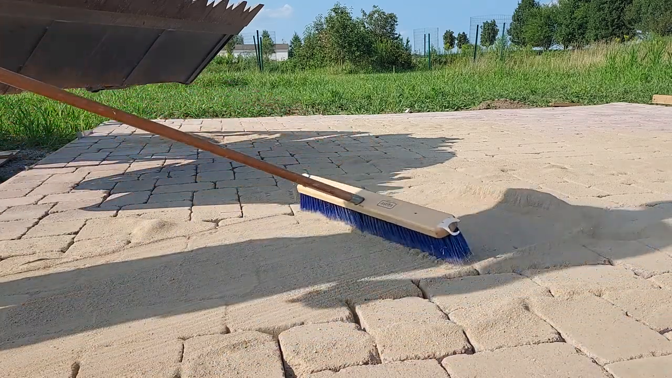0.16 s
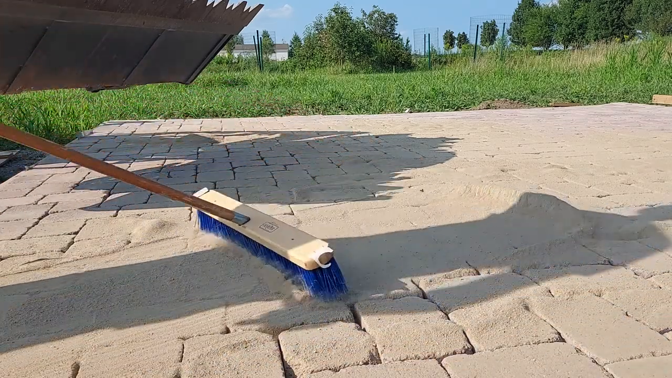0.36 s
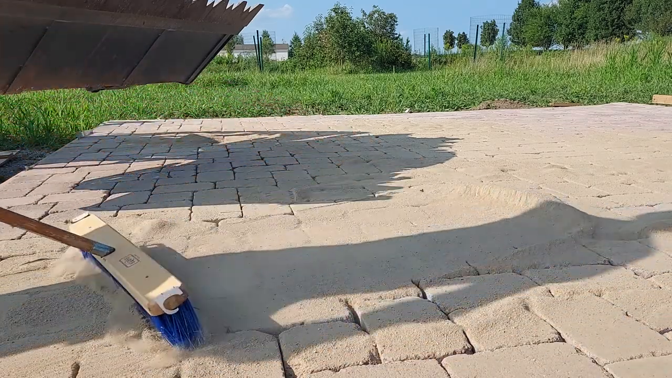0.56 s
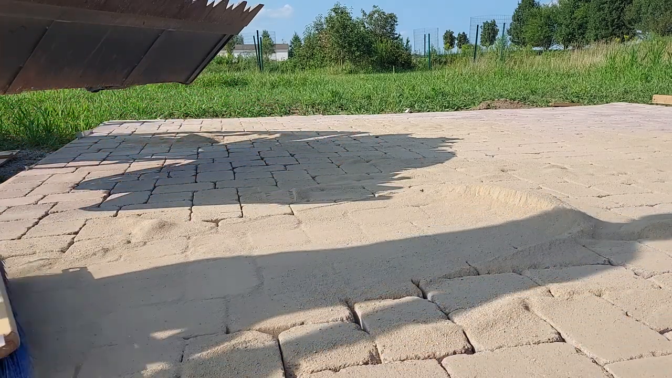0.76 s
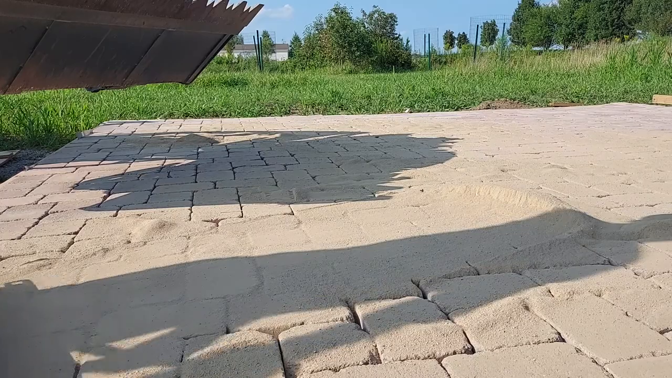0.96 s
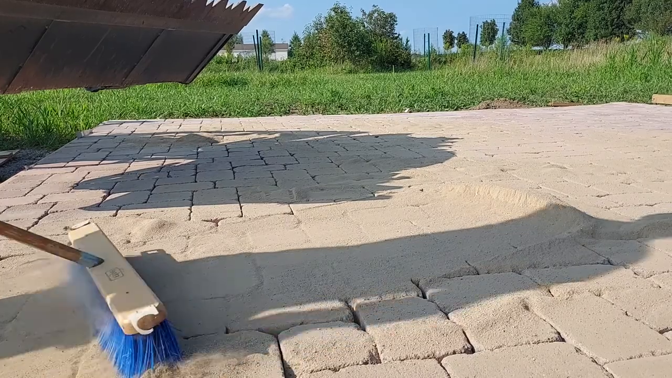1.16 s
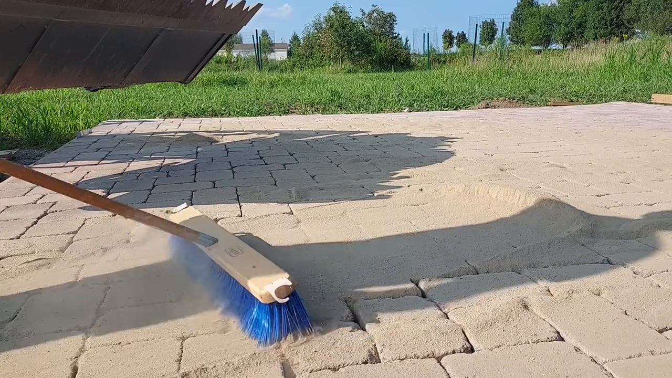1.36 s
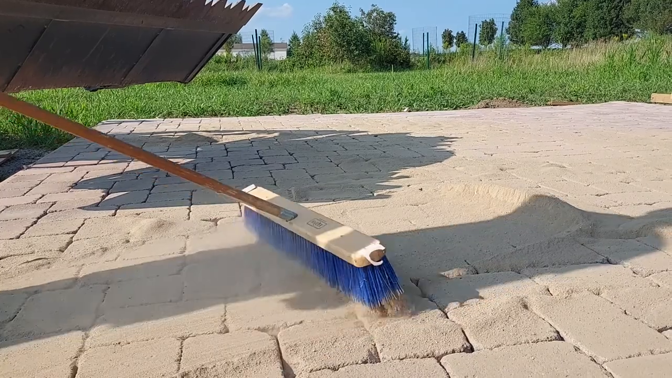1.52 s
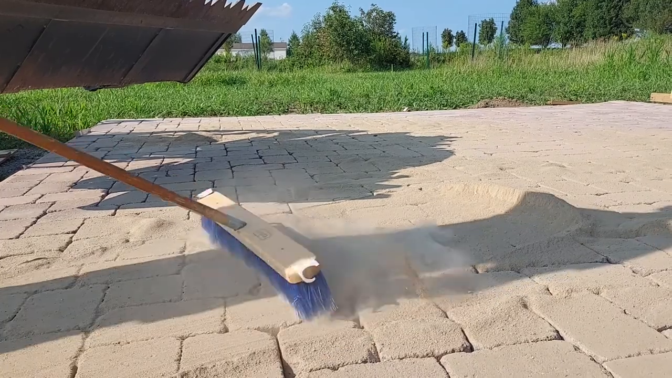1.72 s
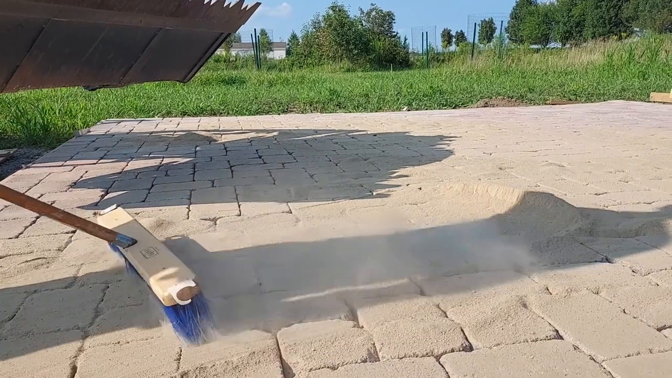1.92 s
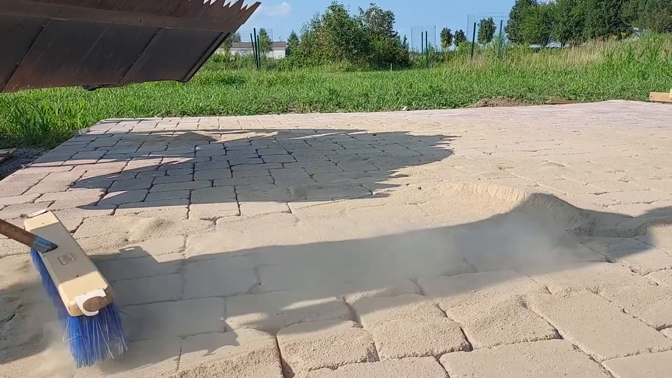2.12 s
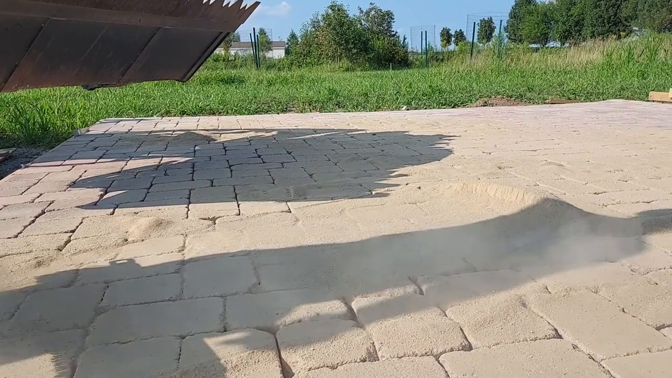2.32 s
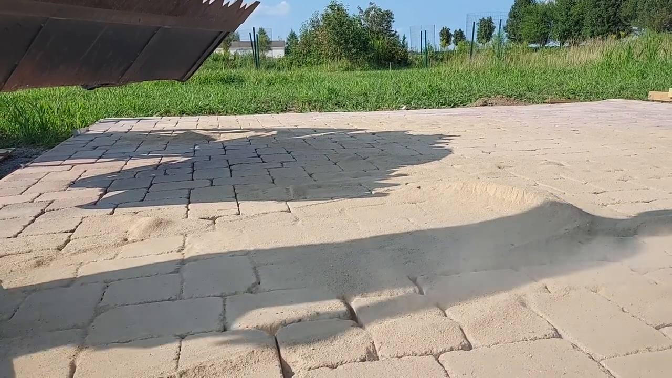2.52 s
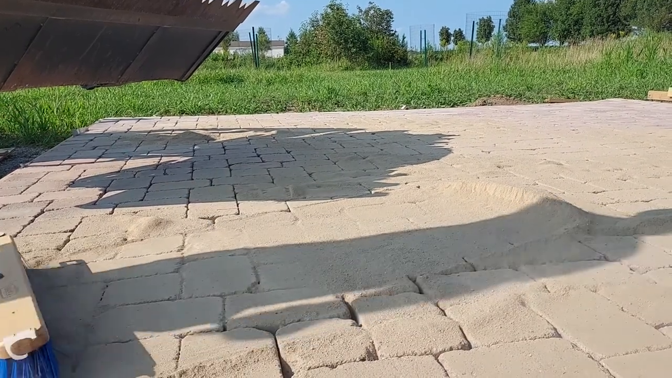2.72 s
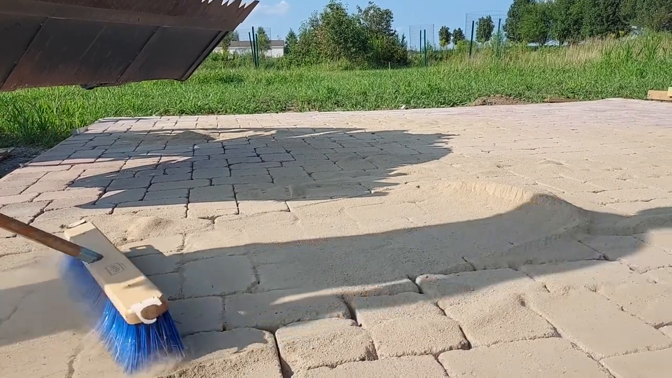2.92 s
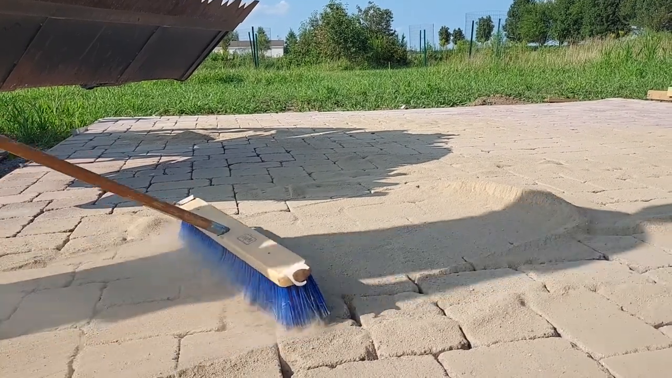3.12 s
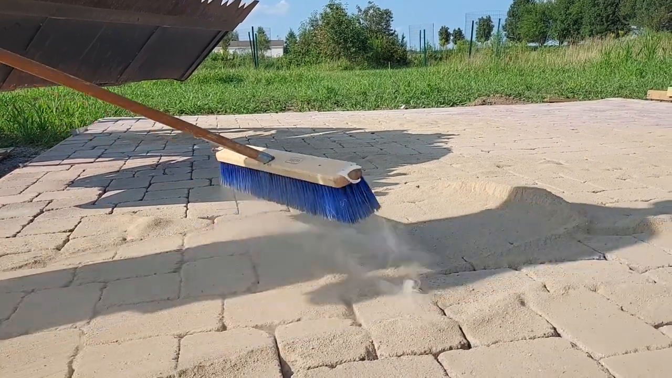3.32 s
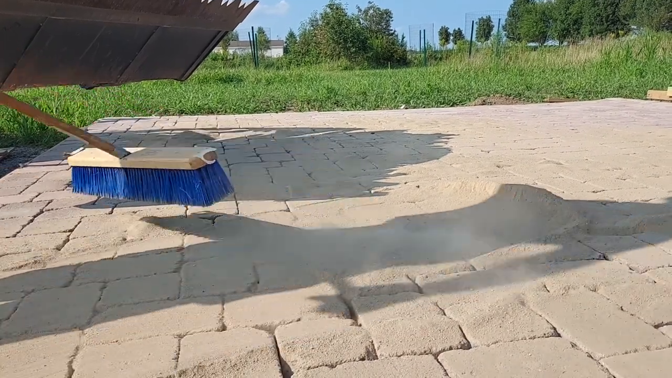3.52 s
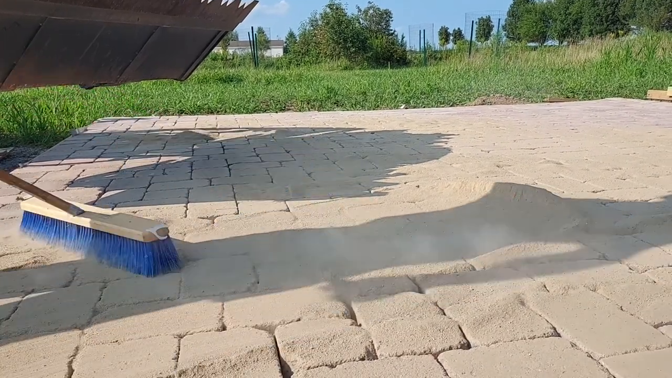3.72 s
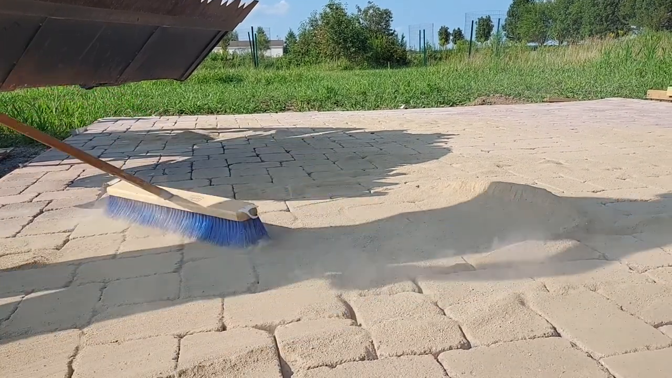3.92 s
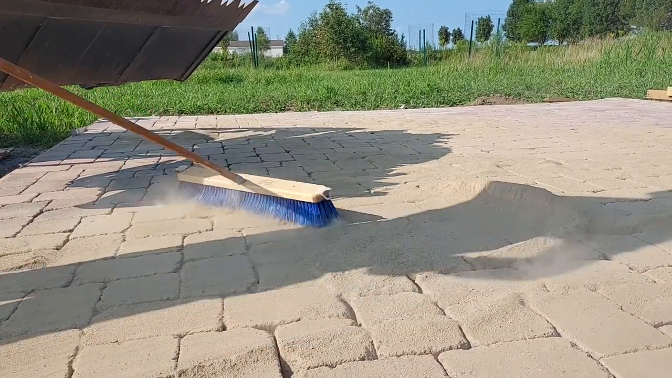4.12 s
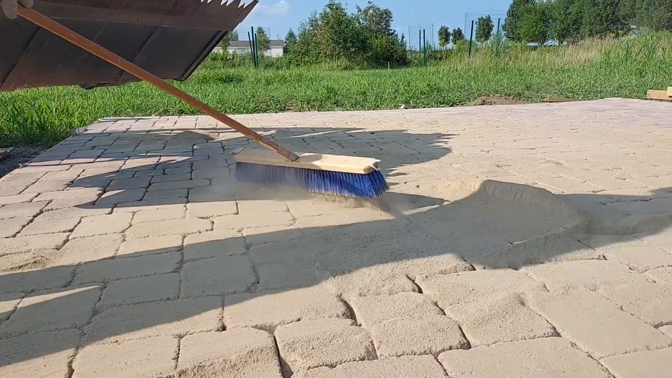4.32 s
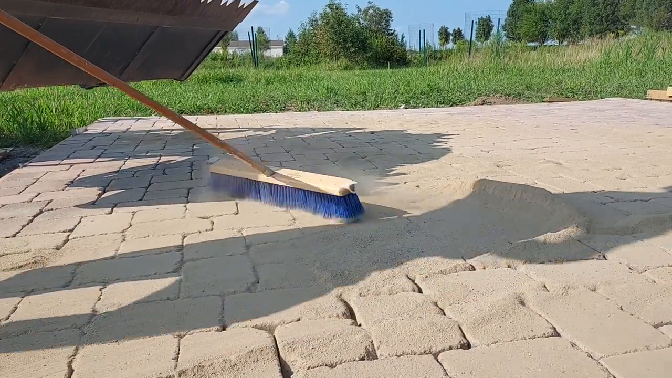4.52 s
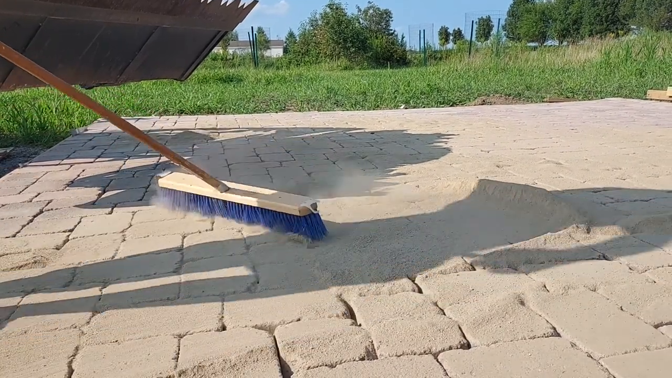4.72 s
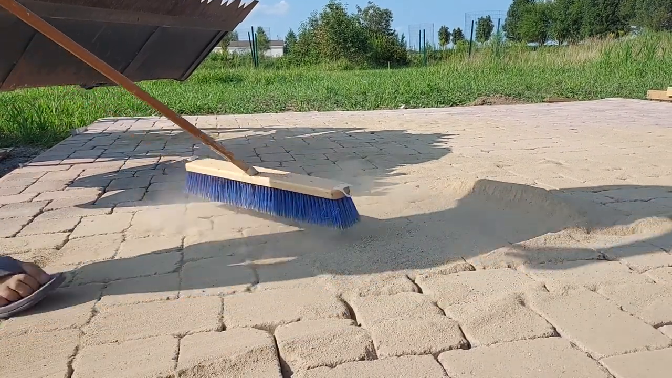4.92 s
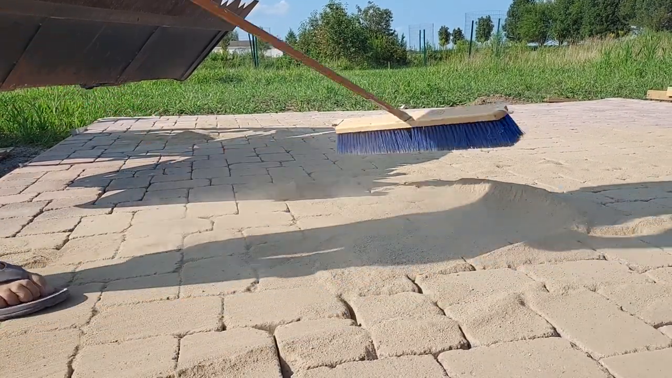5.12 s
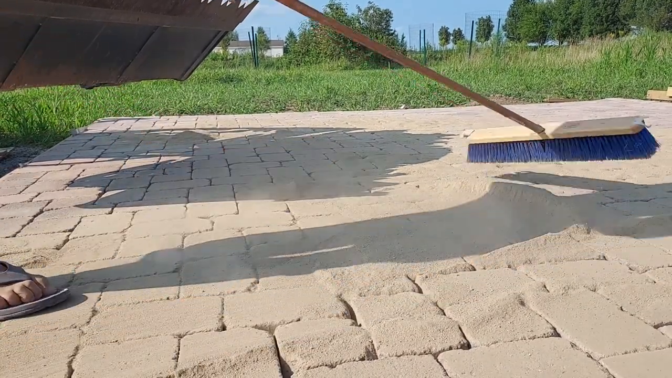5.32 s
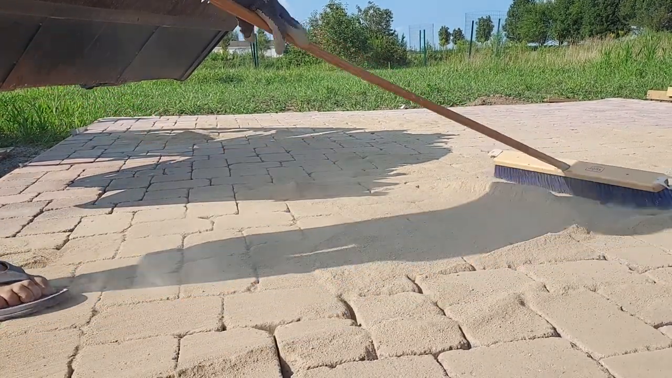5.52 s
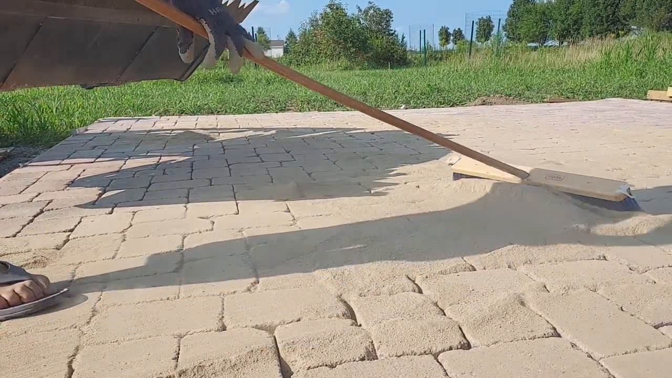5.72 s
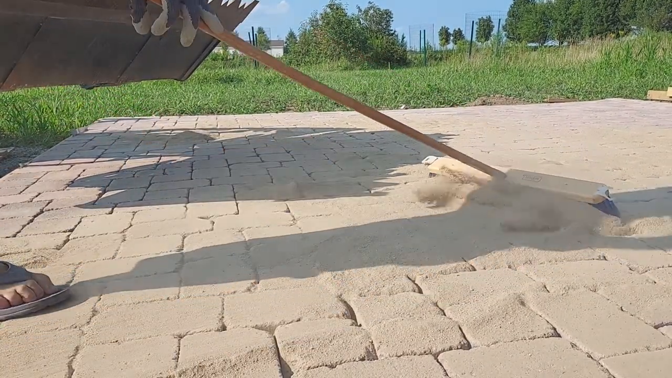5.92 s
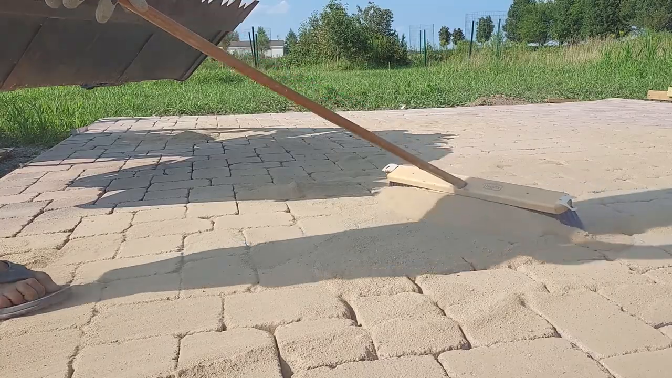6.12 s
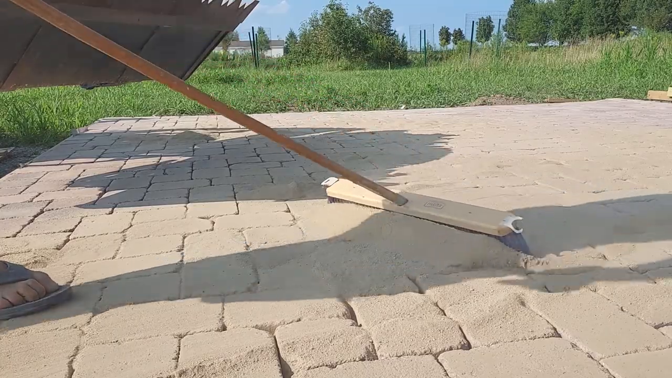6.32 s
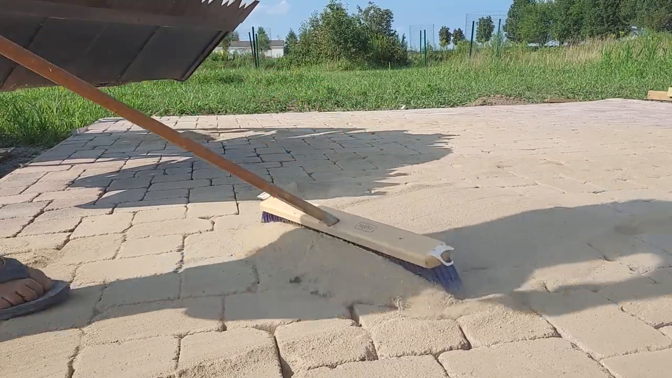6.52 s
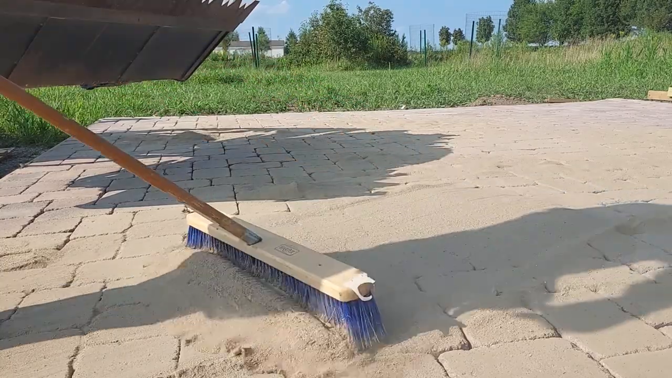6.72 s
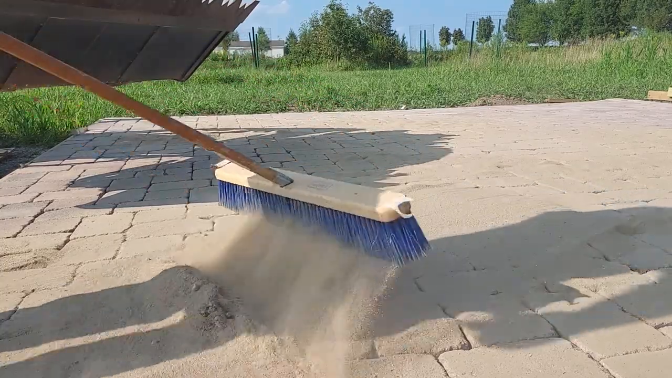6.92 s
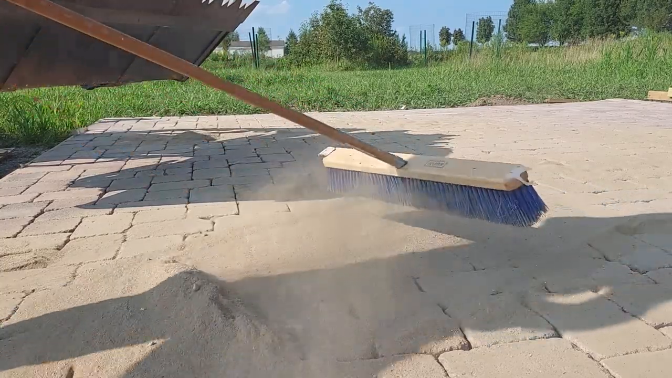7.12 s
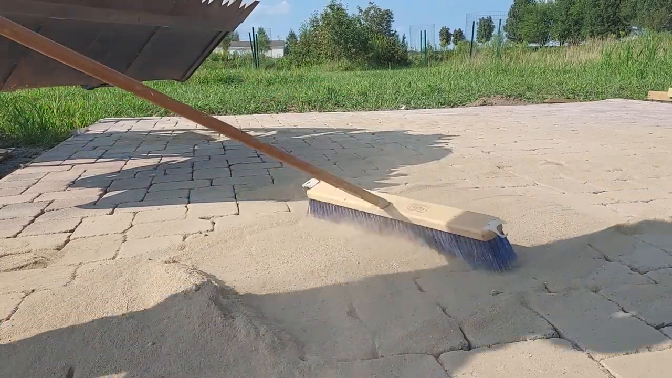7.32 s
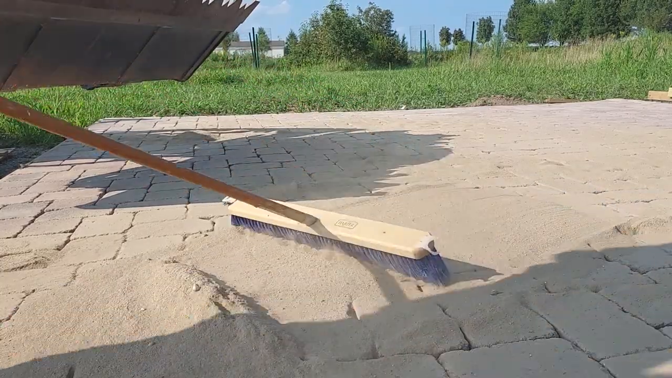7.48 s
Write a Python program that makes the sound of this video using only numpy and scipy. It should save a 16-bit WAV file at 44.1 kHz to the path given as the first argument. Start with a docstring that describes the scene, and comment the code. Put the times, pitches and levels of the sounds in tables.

```python
"""A broom scratches through dry sand on paving stones outdoors, over breeze rumble and insect buzz.
Strokes are coloured grain noise: bristle scratch, fine-sand hiss, rasp of the pushed heap.
Landings add a noise crunch with a ringing mode, and knocks from damped modes of the wooden head.
A small bird twitters in sliding sine chirps; a sandal scuffs in noise bursts, with a soft footfall thud.
All is heard through two microphone ports of a phone held low."""
import sys
import numpy as np
from scipy import signal
from scipy.fft import rfft, irfft, next_fast_len
from scipy.io import wavfile
from scipy.ndimage import uniform_filter1d, map_coordinates

SR = 44100
rng = np.random.default_rng(int(sys.argv[2]) if len(sys.argv) > 2 else 0)


def generate_wav(sig):
    """Save sig (samples, or channels by samples) to the path in sys.argv[1] as 16-bit PCM at SR."""
    pcm = np.round(np.clip(np.atleast_2d(sig).T, -1, 1) * 32767).astype(np.int16)
    wavfile.write(sys.argv[1], SR, pcm)


N = 332955
FFT_N = next_fast_len(N)
BINS_HZ = np.fft.rfftfreq(FFT_N, 1 / SR)

# broom strokes: start/s, end/s, level/dB, swell from start to end/dB, mid-stroke bulge/dB,
# fine sand re scratch/dB, heap re scratch/dB, heap growth/dB, left lead at start/ms, left lead at end/ms
STROKES = [(-.1, 0.768, -42.5, 5.5, -2.5, 0, -2.5, 10, -0.11, 0.29),
           (0.963, 1.53, -37, 5.5, -3, 3, -3, -2.5, 0.3, 0.092),
           (1.677, 2.127, -45, -0.5, 3.5, 3.5, -2.5, -3, 0.088, 0.24),
           (2.48, 3.19, -37, 6, -3, 1.5, -4, -2.5, 0.36, 0.12),
           (3.688, 4.297, -37.5, 4, 0, 5, -5.5, -2.5, 0.21, 0.09),
           (4.534, 4.869, -44, -8, 6, 4, -2.5, -0.5, 0.082, .14),
           (5.472, 5.825, -58, -2, 17.5, 1, 3.5, 6, -0.12, -0.12),
           (6.121, 6.759, -56, 2.5, 9, -5.5, 1, 9, -0.068, -0.056),
           (7.267, 7.65, -42.5, 0, 7, 0, -0.5, 14, 0.027, 0.055)]
# rasp of the pushed heap: f/Hz, relative level/dB
RASP_COLOUR = [(200, -14.5), (400, -12.5), (600, -3), (900, 0), (1250, 4), (1480, 1), (1690, 2.5),
               (2000, -4.5), (3000, -12)]


def undb(db):
    """Decibels to gain."""
    return 10 ** (np.asarray(db) / 20)


def unit(x):
    """Scale to an rms of one."""
    return x / np.sqrt(np.mean(x ** 2))


def pan(left_minus_right_db):
    """Left and right gains for a level difference."""
    return undb(np.array([[left_minus_right_db], [-left_minus_right_db]]) / 2)


def spectrum(points):
    """Gain at every Fourier bin, interpolated in dB over log frequency."""
    hz, db = np.transpose(points)
    return undb(np.interp(np.log(BINS_HZ + 1), np.log(hz), db))


def filtered(x, gain):
    """Apply a gain to every Fourier bin."""
    return irfft(rfft(x, FFT_N) * gain, FFT_N)[..., :N]


def colour(x, points):
    """Colour a white signal and keep its power."""
    return filtered(x, unit(spectrum(points)))


def band(x, hz, width_hz):
    """Gaussian band of a white signal, power kept."""
    return filtered(x, unit(np.exp(-((BINS_HZ - hz) / width_hz) ** 2)))


def resonate(x, hz, width_hz):
    """One narrow resonance, gain one at its centre."""
    b, a = signal.iirpeak(hz, hz / width_hz, fs=SR)
    return signal.lfilter(b, a, x)


def walk(rate_hz):
    """Smooth random wandering, rms one: random steps under a moving average."""
    step = max(int(SR / rate_hz), 2)
    levels = np.repeat(rng.standard_normal(N // step + 2), step)
    return unit(uniform_filter1d(levels, step)[:N])


def grains(spread_db):
    """Dense tiny impacts, a few much stronger than the rest."""
    strength_db = spread_db * np.minimum(rng.exponential(size=N), 6)
    return unit(rng.standard_normal(N) * undb(strength_db))


def add(out, start_s, sound):
    """Mix a short sound in at a time."""
    i = max(int(start_s * SR), 0)
    out[..., i:i + sound.shape[-1]] += sound[..., :N - i]


def arrive(x, lead_ms):
    """Stereo by arrival time: a positive lead delays the right channel."""
    shift = lead_ms * SR / 1000
    return np.array([x, map_coordinates(x, [np.arange(N) - shift], order=3)])


def broom_wide(points, lead_ms, spread_db, width_ms, apart):
    """Three independent grain sources spread in direction, plus sound scattered off the stones."""
    tufts = np.zeros((2, N))
    for place in np.linspace(-1, 1, 3):
        tufts += arrive(colour(grains(spread_db), points), lead_ms + width_ms * place)
    scatter = colour(rng.standard_normal((2, N)), points)
    return unit(unit(tufts) + apart * scatter)


def broom_place(t):
    """Lead of the left microphone in ms: even travel along each stroke and on to the next start."""
    rows = np.array(STROKES)
    return np.interp(t, rows[:, :2].ravel(), rows[:, -2:].ravel())


def stroke_gains(t):
    """Effort drives the scratch; fine sand follows it most steeply, the heap least, with its own growth."""
    attack_s, release_s = 0.15, 0.11  # bristles bend into the sand, lift out of it
    hiss_per_effort, rasp_per_effort = 1.18, 0.77  # dB per dB of scratch effort
    scratch, hiss, rasp = np.zeros((3, N))
    for start, end, db, swell_db, bulge_db, fine_db, heap_db, growth_db, _, _ in STROKES:
        on = (t > start) & (t < end)
        along = (t[on] - start) / (end - start) - .5
        press = np.sin(np.pi / 2 * np.minimum((t[on] - start) / attack_s, 1))
        lift = np.sin(np.pi / 2 * np.minimum((end - t[on]) / release_s, 1)) ** 2
        contact = undb(db) * press * lift
        effort_db = swell_db * along + bulge_db * (np.cos(np.pi * along) - 2 / np.pi)
        scratch[on] += contact * undb(effort_db)
        hiss[on] += contact * undb(fine_db + hiss_per_effort * effort_db)
        rasp[on] += contact * undb(heap_db + rasp_per_effort * effort_db + growth_db * along)
    return scratch, hiss, rasp


def trickle_gains(t):
    """Sand runs off the lifted broom at a rising level; flung sand patters around each stroke's end."""
    start_s, end_s, final_db, rise_db = 4.9, 5.41, -57.5, 9
    settle_db, settle_s = -70, 0.086
    left = np.clip((end_s - t) / (end_s - start_s), 0, 1)
    running = undb(final_db - rise_db * left) * (t > start_s) * (t < end_s)
    settling = undb(settle_db) * sum(np.exp(-np.abs(t - stroke[1]) / settle_s) for stroke in STROKES)
    return running, settling


def sweeping(t, lead_ms):
    """Bristles flick over stone, fine sand hisses, the heap rasps; all catch and slip together."""
    # colours: f/Hz, relative level/dB
    scratch_colour = [(1200, -50), (1900, -0.5), (2500, 4), (3300, 3), (4100, 1.5), (5200, 5), (6400, -1.5),
                      (8000, 1.5), (10000, -9), (11500, -32), (14000, -30)]
    hiss_colour = [(7000, -31), (9500, -6.5), (11000, -3), (12300, 0.5), (14000, -1), (15800, -6)]
    scratch_gain, hiss_gain, rasp_gain = stroke_gains(t)
    catch = undb(1.36 * walk(38) + 0.19 * walk(400))
    scratch = broom_wide(scratch_colour, lead_ms, spread_db=2.5, width_ms=0.041, apart=0.077)
    fine = colour(grains(spread_db=0.0), hiss_colour) * undb(0.5 * walk(900))
    hiss = fine + undb(-15.0) * colour(rng.standard_normal((2, N)), hiss_colour)
    # the heap gives way in small uneven slides
    slides = undb(-2.55 + 0.91 * walk(70))
    rasp = slides * broom_wide(RASP_COLOUR, lead_ms, spread_db=3.0, width_ms=0.11, apart=0.42)
    # the dragging bristles keep the wooden head singing faintly
    singing = resonate(colour(grains(spread_db=2.0), RASP_COLOUR), hz=1648, width_hz=55)
    wood = undb(-11.0) * arrive(unit(singing), lead_ms)
    running, settling = trickle_gains(t)
    coarse_db = -2  # coarse grains re fine in the trickle
    trickle = running * (hiss + undb(coarse_db) * scratch) + settling * scratch
    return catch * (scratch_gain * scratch + hiss_gain * hiss + rasp_gain * (rasp + wood) + trickle)


def low_rumble():
    """Wind eddies rumble, more on the right; Gaussian low swells add breeze gusts and a footfall thud."""
    # colours: f/Hz, relative level/dB
    rumble_colour = [(20, -23), (35, -11), (55, 9.5), (80, 2), (120, -7.5), (160, -7), (230, -47),
                     (400, -45.5)]
    swell_colour = [(25, -6), (55, 6), (85, 3), (130, 0), (180, -22.5), (300, -26), (500, -57), (1500, -74)]
    # low swells: breeze gusts, and a soft footfall thud at 5.935 s:
    # t/s, level/dB, 1/e half length/s, left minus right/dB
    low_swells = [(0.016, -37, 0.14, -7), (0.228, -41.5, 0.055, 7), (0.314, -39, 0.035, -17),
                  (0.704, -48.5, 0.069, -12), (.85, -48.5, .025, -12), (1.345, -47.5, 0.17, -20),
                  (1.763, -47, 0.096, -13.5), (2.456, -43.5, 0.083, -22), (3.087, -55.5, 0.12, -16),
                  (3.472, -52, 0.075, -14), (3.848, -47, .18, -14), (5.626, -49.5, 0.13, -13),
                  (5.935, -41.5, 0.054, -27), (6.05, -47.5, 0.14, -11.5), (6.777, -51, 0.021, -18),
                  (7.142, -46, 0.016, -17)]
    calm_db, wander_db, calm_pan_db = -57, 1.5, -10.5
    common = .5 * rng.standard_normal(N)
    eddies = unit(colour(common + rng.standard_normal((2, N)), rumble_colour))
    strength = undb(calm_db + wander_db * walk(6)) * pan(calm_pan_db)
    t = np.arange(N) / SR
    swell_gain = np.zeros((2, N))
    for peak_s, db, half_s, pan_db in low_swells:
        swell_gain += undb(db) * pan(pan_db) * np.exp(-((t - peak_s) / half_s) ** 2)
    return strength * eddies + swell_gain * colour(rng.standard_normal((2, N)), swell_colour)


def meadow():
    """Coloured noise for soft distant air; Gaussian bands with wandering levels for insect choruses."""
    # distant air: f/Hz, relative level/dB
    air_colour = [(25, -16), (60, -14), (150, 1.5), (300, -14), (600, -21.5), (1400, -30), (2300, -22),
                  (6000, -37.5), (10000, -26.5), (12000, -21.5), (14500, -14), (16000, -12.5)]
    # insect choruses: f/Hz, 1/e half width/Hz, level/dB
    insects = [(4860, 430, -62.5), (7830, 730, -59.5)]
    air = rng.standard_normal(N) + 1.36 * rng.standard_normal((2, N))
    out = undb(-61.0 + 0.37 * walk(1.406)) * colour(air, air_colour)
    for hz, width_hz, db in insects:
        noise = 0.43 * rng.standard_normal(N) + rng.standard_normal((2, N))
        shimmer_db = .5 * walk(11) + 1.34 * walk(70)
        out = out + unit(band(noise, hz, width_hz)) * undb(db + shimmer_db)
    return out


def bird():
    """Evenly spaced thin whistles, each sliding down; pitch and level swing along the phrase."""
    # phrases: first chirp/s, last chirp/s, level/dB, moment of highest pitch/s
    phrases = [(.838, .876, -52, .72), (1.52, 1.611, -50, 1.5), (2.112, 2.331, -52, 2.16),
               (3.254, 3.506, -53, 3.32), (4.386, 4.422, -52, 4.45), (4.756, 5.219, -52, 4.79),
               (5.441, 5.481, -50, 5.42), (5.69, 5.73, -51, 5.57), (5.928, 6.46, -52, 6.05),
               (6.672, 6.98, -53, 6.77), (7.169, 7.29, -52, 7.23)]
    chirp_every_s, chirp_s, chirp_hz, fall = .0425, 0.0278, 4820, 0.079
    swing_s, swing_hz, swing_db = .29, 170, 1.5
    scatter_s, scatter_hz, scatter_db = 0.0024, 35, 4.6
    u, out = np.linspace(0, 1, int(chirp_s * SR)), np.zeros(N)
    for start, end, db, top_s in phrases:
        times = np.linspace(start, end, round((end - start) / chirp_every_s) + 1)
        for s, (late, sharp, loud) in zip(times, rng.standard_normal(size=(20, 3))):
            swing = np.cos(2 * np.pi * (s - top_s) / swing_s)
            centre_hz = chirp_hz + swing_hz * swing + scatter_hz * sharp
            pitch_hz = centre_hz * (1 + fall * (.3 - u ** 2))
            whistle = np.sin(np.pi * u) * np.sin(2 * np.pi * np.cumsum(pitch_hz) / SR)
            level_db = db + swing_db * swing + scatter_db * loud
            add(out, s + scatter_s * late, undb(level_db) * whistle)
    return arrive(out, 0.044)


def landings(lead_ms):
    """Tips strike and bend until the whole brush slaps down; both bursts excite a damped head mode."""
    # touchdowns: tips touch/s, time to bend/s, tips/dB, slap/dB, slap decay/s, relative ring/dB, ring f/Hz
    touchdowns = [(.964, 0.0052, -39, -37.5, 0.014, 3.5, 1720), (1.69, .024, -36, -27.5, 0.007, -1.5, 1690),
                  (2.45, .009, -34, -32.5, 0.0094, 0.5, 2190), (3.658, .01, -36.5, -25.5, 0.0061, -1, 1670),
                  (4.492, .012, -38.5, -32, 0.014, -3.5, 1620), (5.406, 0.015, -45, -28, .0073, -6, 1650),
                  (5.467, .004, -49, -49, 0.0062, 1, 1690), (7.255, .002, -38, -27.5, 0.0031, -4.5, 3040)]
    # crunch: f/Hz, relative level/dB
    crunch_colour = [(200, 14.5), (500, 2), (1100, 6.5), (1450, -1.5), (1680, 7), (2000, 3), (3200, -1),
                     (6000, -7), (9000, -8.5), (12500, 2), (16000, 1)]
    attack_s = .0006
    ring_width_hz = 215  # the bristles damp the head heavily
    slap_damps_db = -5.5  # pressed down, the head rings less than at first touch
    age = np.arange(SR // 6) / SR
    crunch, crack = np.zeros(N), np.zeros(N)
    for touch_s, bend_s, tips_db, slap_db, slap_s, ring_db, hz in touchdowns:
        tips = (touch_s, tips_db, 1.07 * bend_s, ring_db)
        slap = (touch_s + bend_s, slap_db, slap_s, ring_db + slap_damps_db)
        for at_s, db, decay_s, crack_db in (tips, slap):
            attack = 1 - np.exp(-age / attack_s)
            decay = np.exp(-(age / decay_s) ** 2) + undb(-10.5) * np.exp(-age / 0.03)
            burst = undb(db) * attack * decay
            add(crunch, at_s, burst)
            stirred = resonate(burst * rng.standard_normal(len(age)), hz, ring_width_hz)
            add(crack, at_s, stirred * undb(crack_db + 18.5))
    bristles = broom_wide(crunch_colour, lead_ms, spread_db=2.0, width_ms=0.053, apart=0.31)
    return crunch * bristles + arrive(crack, lead_ms)


def ring(modes, age):
    """Damped modes after a blow; neighbouring modes swing in opposite directions."""
    out = np.zeros(len(age))
    for k, (hz, db, t60_s) in enumerate(modes):
        decay = np.exp(-np.log(1000) * age / t60_s)
        out += (-1) ** k * undb(db) * np.sin(2 * np.pi * hz * age) * decay
    return out


def knocks(lead_ms):
    """The head bottoms out on its bristles: softer contact is duller, and the long handle flexes."""
    # blows: t/s, level/dB, contact/ms, handle flex/dB
    blows = [(0.965, -22, 2.2, -12.5), (1.7146, -22.5, 1.8, 0), (2.467, -28.5, 0.94, 2),
             (3.668, -10, 0.93, -3), (4.306, -43.5, 0.28, -22), (4.508, -20.5, 0.83, -2.5),
             (4.519, -27.5, 0.49, -27), (4.894, -40, 1.04, -6), (5.424, -23.5, 0.31, -4.5),
             (7.257, -38, 0.94, 12.5), (7.27, -27, 0.25, -22), (7.504, -33, 0.29, -19)]
    # modes of handle and head: f/Hz, relative level/dB, t60/s
    handle_modes = [(131, -1, 0.12)]
    head_modes = [(245, -5, 0.046), (332, -4, 0.036), (426, -8, 0.035), (556, -12, 0.075),
                  (685, -7.5, 0.031), (1004, -16, 0.071), (1280, -16, 0.037), (1685, -12.5, 0.057),
                  (2050, -14, 0.065), (3074, -5.5, 0.061)]
    age, out = np.arange(SR // 4) / SR, np.zeros(N)
    for s, db, contact_ms, flex_db in blows:
        push = np.exp(-age * 1000 / (contact_ms / 2))
        wood = ring(head_modes, age) + undb(flex_db) * ring(handle_modes, age)
        add(out, s, undb(db) * signal.fftconvolve(wood, push / push.sum()))
    # so small a body radiates little deep bass
    radiation = signal.butter(2, 75, "high", fs=SR, output="sos")
    return arrive(signal.sosfilt(radiation, out), lead_ms)


def scuffs():
    """A sandal on the left grinds grains against the paving: pressure pulses shape grain noise."""
    # steps: t/s, level/dB, time scale/s
    steps = [(4.906, -57, 0.021), (4.94, -56, 0.025), (4.974, -52.5, 0.021), (5.085, -50.5, 0.042),
             (5.114, -59, 0.033), (5.904, -51.5, 0.0074), (5.928, -52.5, 0.068), (5.975, -55.5, 0.077),
             (6.054, -54, 0.012), (6.147, -60.5, 0.04)]
    # sole on sandy stone: f/Hz, relative level/dB
    sole_colour = [(300, -9), (1200, -12), (2000, 4), (2700, 4), (4200, 1.5), (6000, -1.5), (9000, -5),
                   (13000, -5), (16000, -17)]
    age, pressure = np.arange(SR // 3) / SR, np.zeros(N)
    for s, db, scale_s in steps:
        add(pressure, s, undb(db) * (age / scale_s) * np.exp(1 - (age / scale_s) ** 2))
    return pressure * broom_wide(sole_colour, lead_ms=0.26, spread_db=4.5, width_ms=0.022, apart=.5)


def scene():
    """Broom and sandal scuffs pass the port colouring; low rumble, bird and meadow are added without it."""
    # port response: f/Hz, left minus right/dB
    port_difference = [(150, -5.5), (350, -2.5), (550, 4.5), (1350, 1.5), (1700, -1), (2400, 2.5),
                       (3400, -1.5), (4400, 3.5), (5000, 1), (5700, 1), (6600, -0.5), (9000, 5.5),
                       (10200, 7), (11500, -0.5), (13500, -4), (16000, 5.5)]
    t = np.arange(N) / SR
    lead_ms = broom_place(t)
    broom = sweeping(t, lead_ms) + landings(lead_ms) + knocks(lead_ms)
    tilt = np.sqrt(spectrum(port_difference))
    near = filtered(broom + scuffs(), np.array([tilt, 1 / tilt]))
    return near + low_rumble() + bird() + meadow()


def record(dry):
    """The phone cuts the top: steep elliptic low-pass."""
    top_hz, ripple_db, stop_db = 15900, .2, 70
    low_pass = signal.ellip(10, ripple_db, stop_db, top_hz, fs=SR, output="sos")
    return signal.sosfilt(low_pass, dry)


dry = scene()
out = record(dry)
generate_wav(out)
```